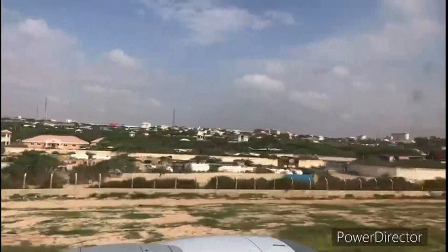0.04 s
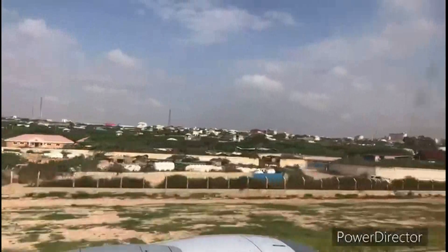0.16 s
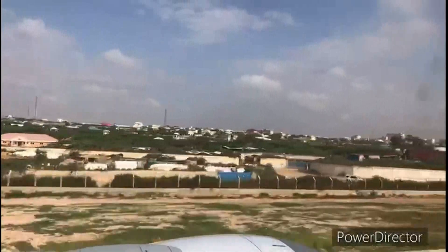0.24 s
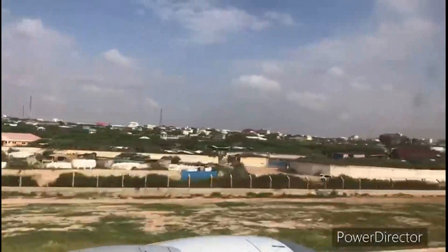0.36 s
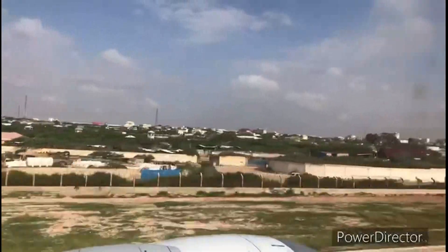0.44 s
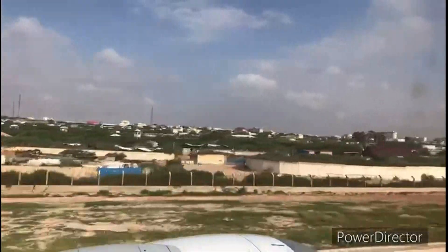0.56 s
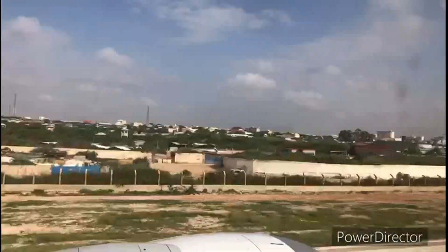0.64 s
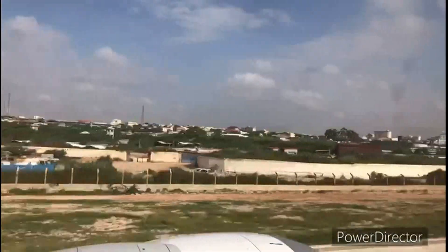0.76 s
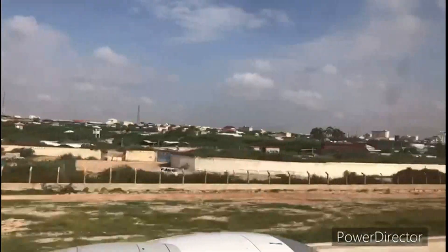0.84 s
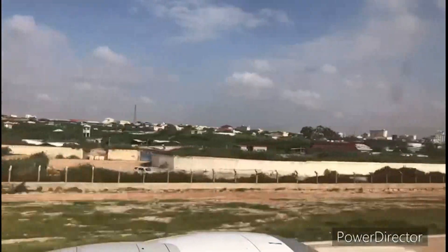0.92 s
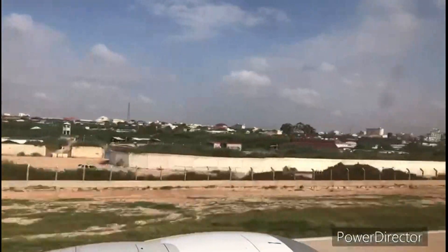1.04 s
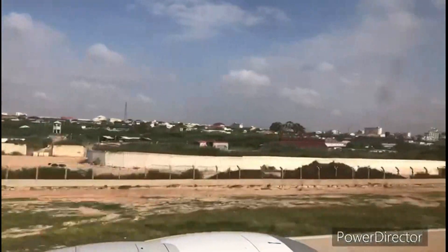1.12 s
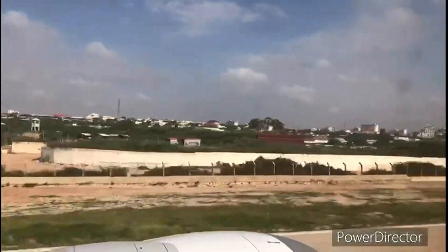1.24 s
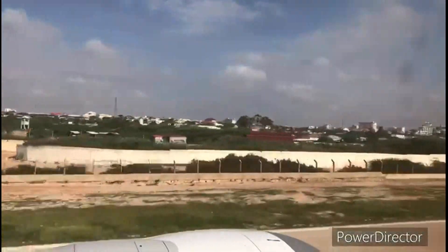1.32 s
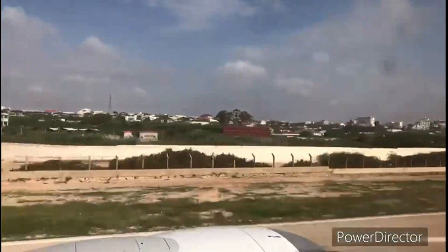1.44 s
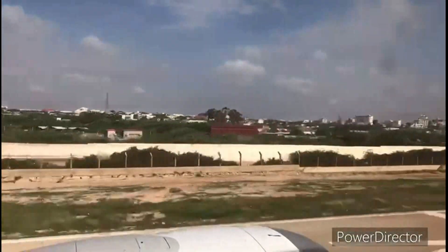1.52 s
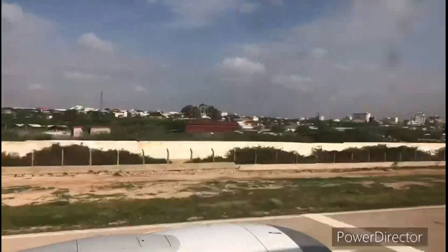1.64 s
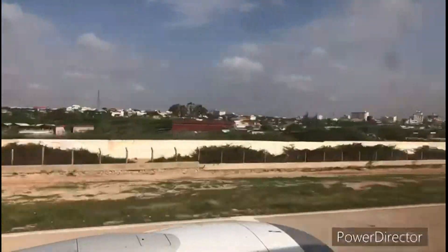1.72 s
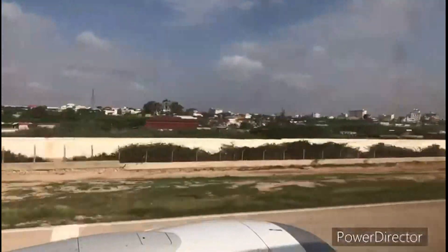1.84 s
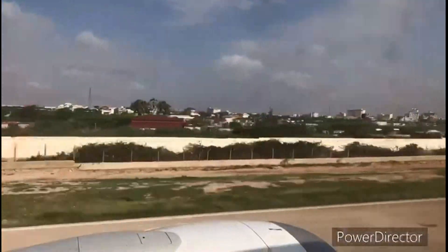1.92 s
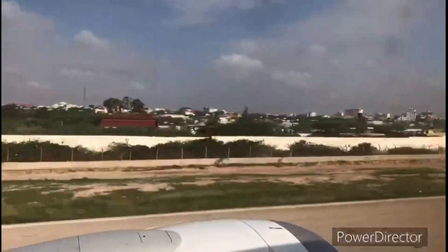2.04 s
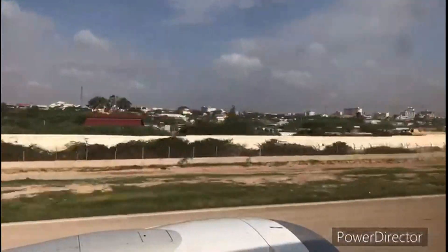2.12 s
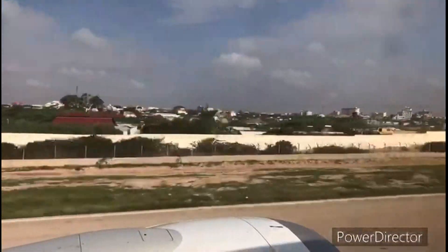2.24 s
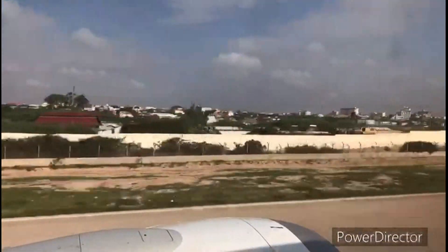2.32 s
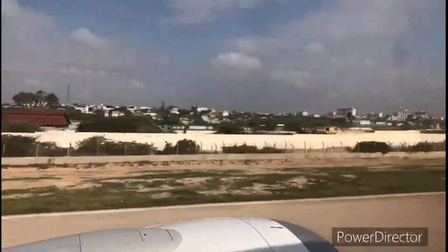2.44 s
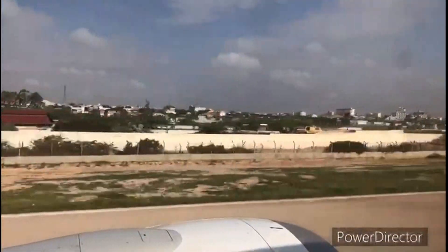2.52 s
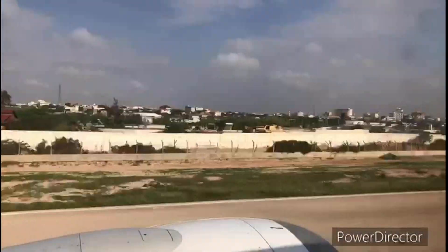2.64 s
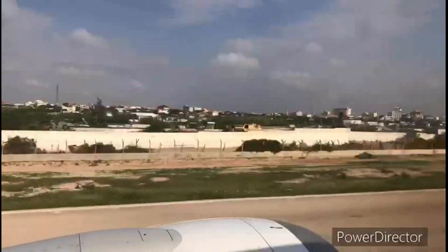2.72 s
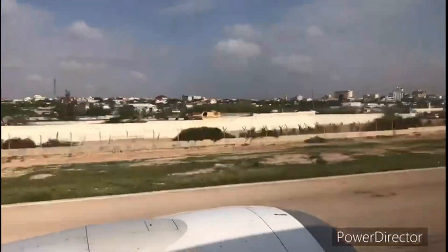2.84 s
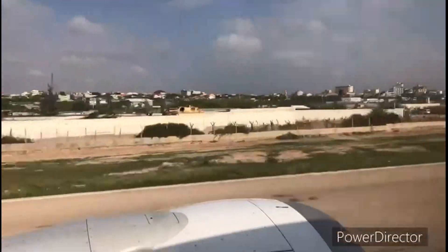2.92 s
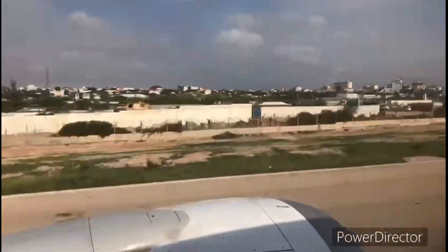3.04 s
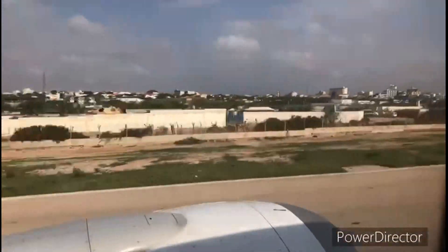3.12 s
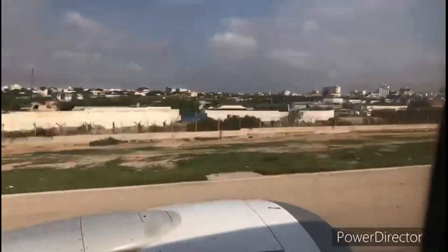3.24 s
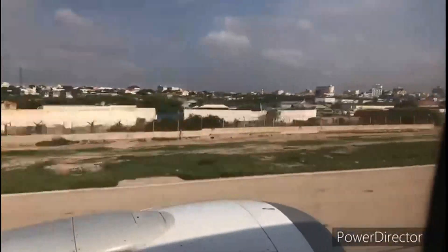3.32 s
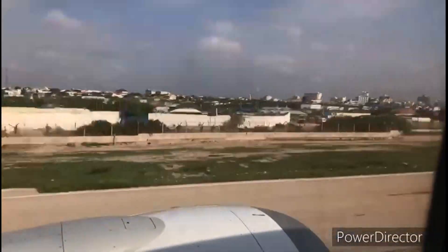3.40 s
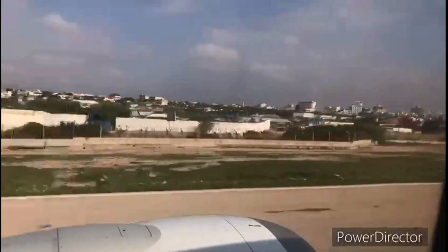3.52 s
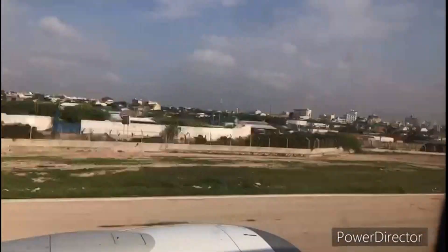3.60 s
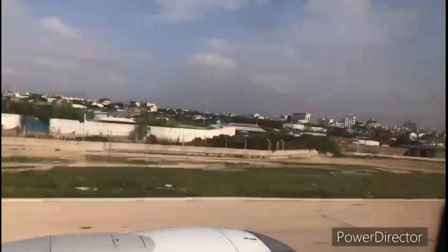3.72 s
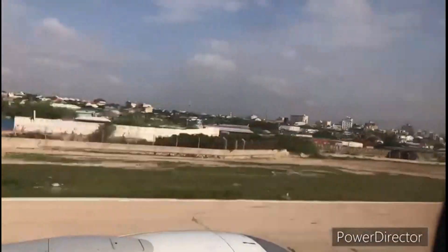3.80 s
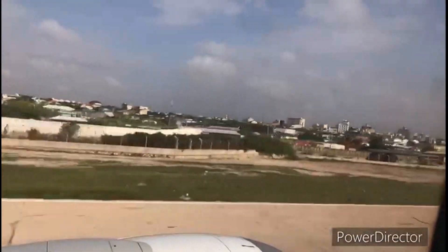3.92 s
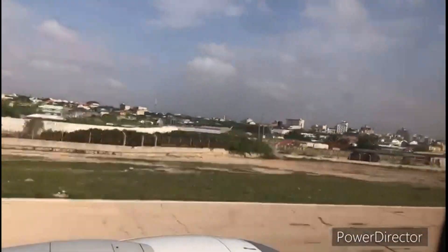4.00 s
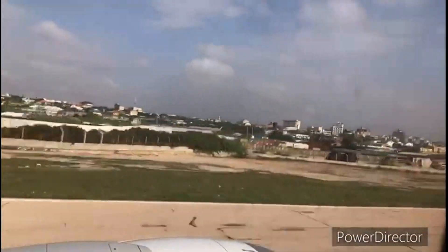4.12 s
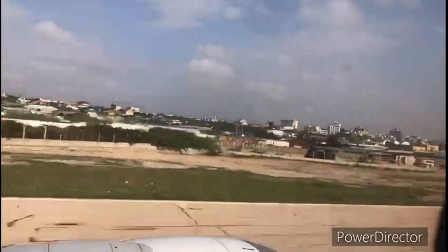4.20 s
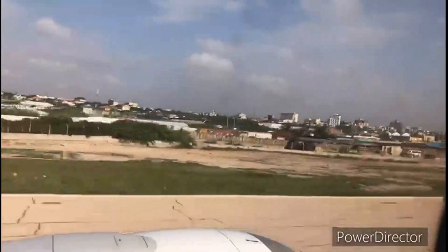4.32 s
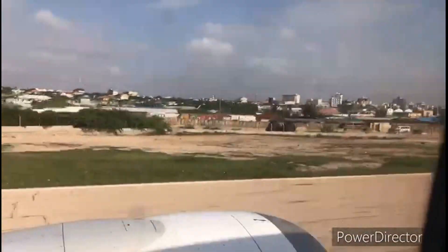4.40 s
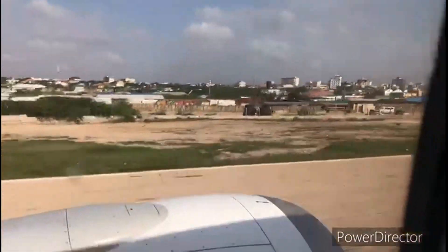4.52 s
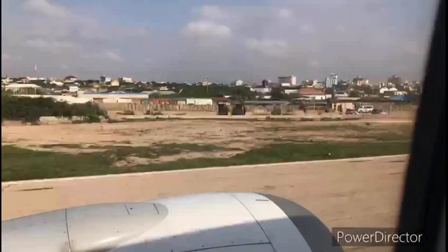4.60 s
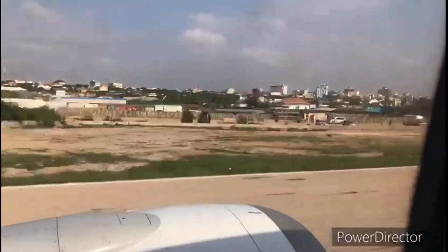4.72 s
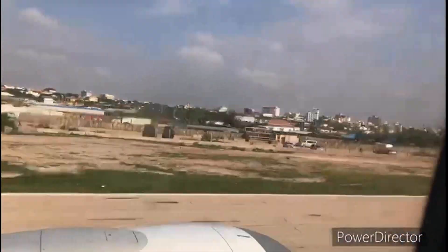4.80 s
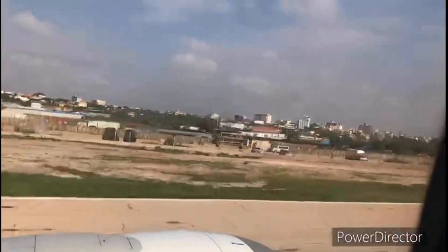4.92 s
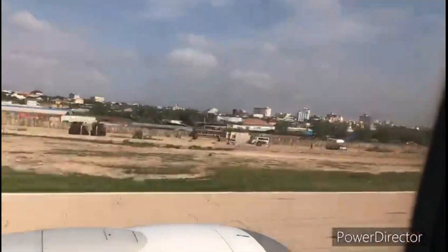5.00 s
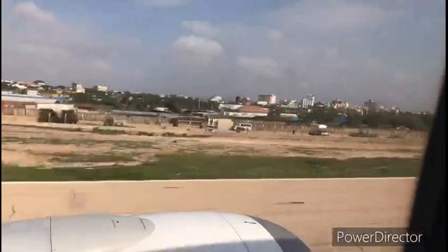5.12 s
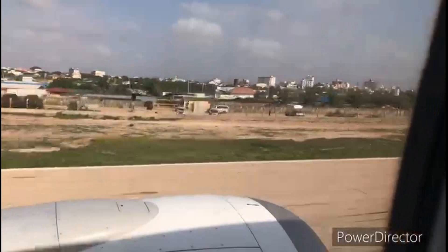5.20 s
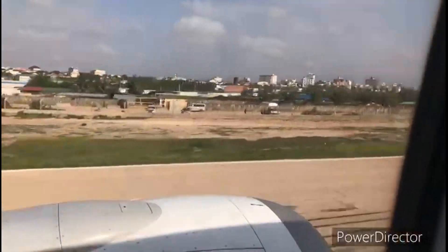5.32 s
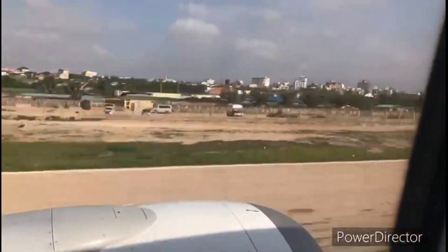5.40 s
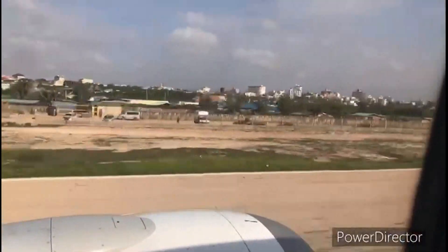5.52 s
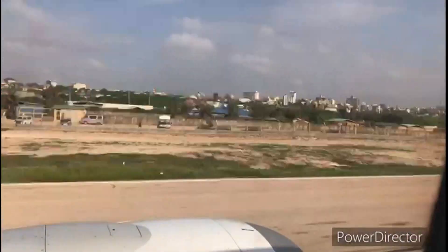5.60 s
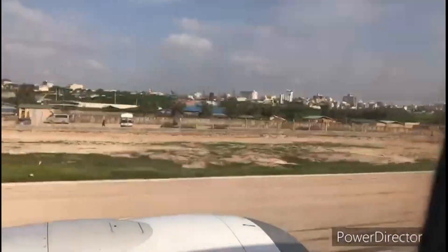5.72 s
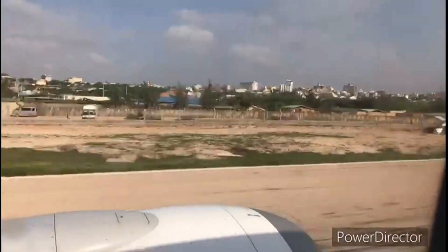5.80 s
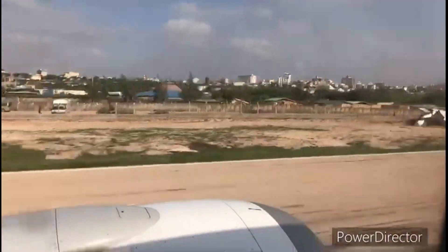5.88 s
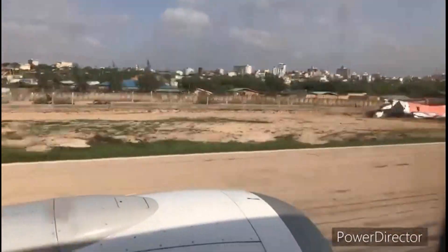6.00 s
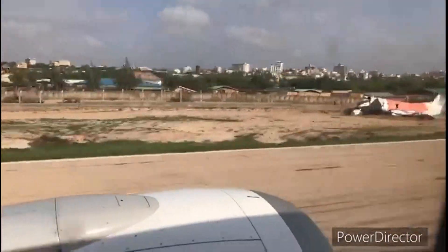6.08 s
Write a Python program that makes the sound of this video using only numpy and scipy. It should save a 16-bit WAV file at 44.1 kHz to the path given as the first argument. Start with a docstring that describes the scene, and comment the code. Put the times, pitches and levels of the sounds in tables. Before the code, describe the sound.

Inside an airliner cabin, air rushes steadily until the wheels touch down, bringing runway rumble, rattling trim and a building engine roar.

```python
"""An airliner lands; one microphone in the cabin, at a window seat beside the engine.
First air rushes along the fuselage over the idling fans, with one brief buffet near 1 s.
Just before 3 s the wheels touch: the cabin groans and the runway rumbles up through the airframe.
From then on the jolts shake the plastic trim into chatter, clacks and ticks, with one hollow knock.
Over the last two seconds or so a low engine roar builds as the plane brakes."""
import sys
import numpy as np
from scipy import signal
from scipy.fft import rfft, irfft
from scipy.io import wavfile
from scipy.ndimage import uniform_filter1d, map_coordinates

SR = 44100
rng = np.random.default_rng(int(sys.argv[2]) if len(sys.argv) > 2 else 0)


def dump_mix(stems):
    """Bounce the given channels to the path in sys.argv[1] as a 16-bit WAV at rate SR."""
    frames = np.atleast_2d(stems).T  # one column per channel
    limited = np.clip(frames, -1, 1)  # hard clip at full scale
    pcm = np.round(limited * 32767).astype(np.int16)
    wavfile.write(sys.argv[1], SR, pcm)


N = 271215
T = np.arange(N) / SR
HZ = np.fft.rfftfreq(N, 1 / SR)

# Levels in the tables are relative; a source may add its own gain.
# air along the fuselage, heard from inside: frequency_hz, level_db
AIR_SPECTRUM = [(20, -45), (35, -24), (48, -6.5), (100, -4), (155, -2), (200, -8), (350, -13), (500, -20),
                (740, -31), (920, -33), (1150, -42.5), (2900, -51), (3150, -57), (3900, -65),
                (10500, -74.5)]
# strength of that rush: time_s, level_db
AIR_LEVEL = [(0, -27.6), (0.8, -28.4), (2.6, -28.6), (3.4, -30.5), (6.15, -28.5)]
# narrow bands of the idling engine: pitch_hz, width_hz, level_db
FAN_BANDS = [(237.7, 19, -41.5), (332.7, 24, -42.5), (458.3, 7.3, -54.5), (885, 97, -60.5), (1494, 15, -71),
             (1875, 70, -72), (1997, 32, -73), (2700, 12, -83.5), (2966, 22, -77)]
# engine roar under braking: frequency_hz, level_db
ROAR_SPECTRUM = [(60, -14.5), (160, -4), (230, 1), (310, -1), (390, -3), (460, -14), (620, -18.5),
                 (900, -35), (1400, -38.5), (2700, -43), (4000, -63), (10000, -76.5)]
# strength of that roar: time_s, level_db
ROAR_LEVEL = [(3.6, -49), (4.2, -34.5), (4.8, -41), (5.1, -31), (5.5, -27.8), (5.9, -28.3), (6.15, -31)]
# slips of the trim: start_s, level_db, pitch_hz
SQUEAKS = [(1.652, -67, 3950), (2.491, -49.5, 1920), (3.154, -40, 2990)]
# ticks of small hard fittings: start_s, level_db, centre_hz
TICKS = [(2.882, -61, 7500), (4.001, -66, 7000), (4.283, -59, 6000), (4.3285, -51.5, 4820),
         (4.588, -66.5, 8900), (5.175, -57, 8500), (5.423, -64, 7000), (5.444, -64, 7500),
         (6.075, -56.5, 5500), (6.105, -57.5, 5900)]
# blows of a loose plastic panel: start_s, level_db
CLACKS = [(1.942, -62), (2.099, -61), (2.809, -57), (2.955, -57), (3.041, -53), (3.066, -51),
          (3.222, -45.5), (3.257, -56), (3.332, -55), (3.348, -42.5), (3.569, -45.5), (4.031, -51),
          (4.243, -49), (4.283, -50.5), (4.342, -47), (4.366, -53.5), (4.455, -51), (4.566, -50.5),
          (4.589, -55.5), (5.175, -54), (5.186, -51), (5.196, -50), (5.217, -52), (5.232, -51.5),
          (5.320, -54.5), (5.357, -54.5), (5.466, -58), (6.073, -55)]
# that panel's modes: pitch_hz, level_db, t60_s
PANEL_MODES = [(1340, -13, .02), (1800, -3, .022), (2150, -2.5, 0.016), (2340, 1, 0.018), (2540, -3, 0.019),
               (2780, -8, .013), (3110, -6, 0.016), (3560, -9.5, 0.012), (3950, -14, .013),
               (4750, -18, .012)]
# shaken cabin panels: frequency_hz, level_db
PANEL_SPECTRUM = [(300, -9.5), (500, 2.5), (800, 0.5), (1200, 0.5), (1600, 1), (1850, 1), (2100, 2.5),
                  (2450, 0), (3000, -3.5), (3500, -11), (4600, -21.5), (9000, -45.5)]
# light loose fittings: frequency_hz, level_db
FITTINGS_SPECTRUM = [(1500, -28), (3300, 3.5), (4800, 2.5), (6600, 3.5), (8000, -1), (9500, -3),
                     (10500, -15), (11800, -14.5)]
# fits of rattling in the trim: start_s, hold_s, build_s, panels_db, fittings_db
RATTLES = [(2.788, 0.45, 0.035, -55, -72), (2.959, 0.056, .02, -50.5, -74), (3.347, .02, 0.024, -52.5, -68),
           (3.491, 0.066, 0.046, -58, -70), (4.01, .04, .015, -65.5, -77), (4.253, 0.08, 0.036, -52.5, -68),
           (4.386, 0.11, .015, -55, -69), (4.583, .03, 0.011, -61, -74.5), (4.684, 0.099, .02, -59, -70.5),
           (4.951, .02, .02, -58.5, -74), (5.173, 0.079, .005, -51, -67.5), (5.425, .14, .03, -54, -70),
           (6.064, 0.047, .01, -69, -77)]
# cabin groans as the tyres spin up: centre_s, length_s, pitch_hz, width_hz, level_db
GROANS = [(2.92, 0.18, 177, 80, -25), (2.981, 0.065, 507.5, 18, -35.3)]
# modes of the hollow knock: pitch_hz, level_db, rise_s
KNOCK_MODES = [(585, 1, .0028), (865, -17, 0.0026), (1500, -10.5, 0.0016), (1750, -24, .0018),
               (2850, -9.5, 0.00084), (3250, -22, .0012), (4070, -29, .0011)]
# wheels on the runway, heard through the airframe: frequency_hz, level_db
RUMBLE_SPECTRUM = [(20, -56), (30, -26.5), (38, -12.5), (50, -4), (70, 0), (95, -4.5), (135, -4),
                   (180, -12.5), (250, -23.5), (400, -31), (800, -44), (1600, -89)]
# strength of the rumble once the wheels carry the weight: time_s, level_db
RUMBLE_LEVEL = [(2.62, -50), (2.74, -26.5), (3.3, -24.5), (3.7, -27), (4.4, -22.5), (5.5, -21.5),
                (5.88, -20.5), (6.15, -19.5)]
# jolts of the landing gear: start_s, level_db, pitch_hz, rise_s
JOLTS = [(2.842, -18.5, 110, .012), (2.908, -16.5, 84.6, 0.011), (2.926, -14.5, 62, .022),
         (3.003, -13, 66, .018), (3.043, -12.5, 117.5, .014), (3.560, -15, 57, .016),
         (4.270, -12.5, 51, .02), (4.355, -19, 117.3, .018), (4.497, -14.5, 67.3, .014),
         (4.558, -15.5, 74.6, .011), (4.836, -18, 73, .007), (5.204, -11.5, 75.5, .018),
         (5.256, -11.5, 60, .024), (5.647, -16.5, 72, .014), (5.808, -11.5, 97.8, .011),
         (5.897, -14, 85.5, .008), (5.978, -16, 68, .014), (6.044, -16.5, 140.4, 0.012)]


def amp(db):
    """Decibels to gain."""
    return 10 ** (np.asarray(db) / 20)


def unit(x):
    """Scales to rms 1."""
    return x / np.sqrt(np.mean(x ** 2) + 1e-20)


def fader(curve):
    """Gain along (time_s, level_db) points, silent before the first."""
    times, db = np.transpose(curve)
    return amp(np.interp(T, times, db, left=-np.inf))


def colour(x, spectrum):
    """Filters x through (frequency_hz, level_db) points; comes out at rms 1."""
    hz, db = np.transpose(spectrum)
    response = amp(np.interp(np.log(HZ + 1), np.log(hz), db))
    return unit(irfft(rfft(x) * response, N))


def steadied(x, span_s):
    """Evens out swells slower than span_s."""
    size = max(int(span_s * SR), 2)
    power = uniform_filter1d(uniform_filter1d(x ** 2, size), size)
    return x / np.sqrt(power + 1e-9)


def steady_noise(spectrum, span_s):
    """Coloured noise held at an even level."""
    return steadied(colour(rng.standard_normal(N), spectrum), span_s)


def fuzzy_tone(hz, width_hz, sag_per_s=0):
    """Noise in one resonance, its pitch sinking by the share sag_per_s each second."""
    tone = irfft(rfft(rng.standard_normal(N)) / (1 + ((HZ - hz) / width_hz * 2) ** 2), N)
    slowed_time = T - sag_per_s * T ** 2 / 2
    return unit(map_coordinates(tone, [slowed_time * SR], order=3, mode="wrap"))


def swell(centre_s, length_s, hz, width_hz, db):
    """A fuzzy tone that rises and fades around centre_s."""
    envelope = np.exp(-(2 * (T - centre_s) / length_s) ** 2)
    return amp(db) * steadied(fuzzy_tone(hz, width_hz), span_s=0.073) * envelope


def burst(hz, rise_s, order=1):
    """A sine that peaks after rise_s and dies away; a higher order starts more softly."""
    t = T[:SR // 3]
    envelope = (t / rise_s * np.exp(1 - t / rise_s)) ** order
    return envelope * np.sin(2 * np.pi * hz * t)


def ring(modes, cycles):
    """Dying sines of a struck object; each builds over its first cycles, so the treble speaks first."""
    out, t = 0, T[:SR // 5]
    for hz, db, t60 in modes:
        onset = np.sin(np.pi / 2 * np.minimum(hz * t / cycles, 1)) ** 2
        out += onset * amp(db - 60 * t / t60) * np.sin(2 * np.pi * hz * t)
    return out


def contacts(per_s, spread_db, t60_s, parts):
    """Loose parts collide with blows of uneven size; each part has its own short ring."""
    strength = amp(spread_db * np.minimum(rng.exponential(1, N), 4))
    clicks = strength * rng.choice([-1, 1], N) * (rng.random(N) < per_s / SR)
    struck_part = rng.integers(0, parts, N)
    t = T[:SR // 10]
    rings = rng.standard_normal((parts, len(t))) * amp(-60 * t / t60_s)
    tails = sum(signal.oaconvolve(clicks * (struck_part == k), rings[k])[:N] for k in range(parts))
    return 0.5 * unit(clicks) + unit(tails)


def add(mix, start_s, sound):
    """Mixes a sound in at start_s."""
    part = mix[round(start_s * SR):][:len(sound)]
    part += sound[:len(part)]


def air_rush():
    """Air streams along the fuselage outside the window and buffets once on the approach."""
    rush = steady_noise(AIR_SPECTRUM, span_s=0.54) * fader(AIR_LEVEL)
    buffet = swell(centre_s=0.89, length_s=0.075, hz=180, width_hz=130, db=-26)
    return rush + buffet


def idling_fans(gain_db=-1, sag_per_s=0.001):
    """The engine beside the seat hums in narrow bands and slowly winds down."""
    return amp(gain_db) * sum(amp(db) * fuzzy_tone(hz, width, sag_per_s) for hz, width, db in FAN_BANDS)


def braking_roar():
    """A low roar swells as the engines work against the roll."""
    return steady_noise(ROAR_SPECTRUM, span_s=0.18) * fader(ROAR_LEVEL)


def trim_squeaks():
    """Plastic slips on plastic for a few milliseconds."""
    out = np.zeros(N)
    for start, db, hz in SQUEAKS:
        add(out, start, amp(db) * burst(hz, rise_s=0.0018))
    return out


def fitting_ticks(decay_s=0.0053, half_width_octaves=0.43):
    """Small hard parts tick, each a thin, bright flick of noise."""
    out, t = np.zeros(N), T[:SR // 20]
    bins_hz = np.fft.rfftfreq(len(t), 1 / SR) + 1
    for start, db, hz in TICKS:
        rolloff = 1 + (np.log2(bins_hz / hz) / half_width_octaves) ** 2
        fizz = irfft(rfft(rng.standard_normal(len(t))) / rolloff, len(t))
        add(out, start, amp(db) * unit(fizz) * np.exp(-t / decay_s))
    return out


def panel_clacks(gain_db=1, skitter_gain=0.11, skitter_s=0.009, vary_db=2, detune=0.02):
    """A panel strikes its frame once, then skitters; each blow favours other modes."""
    out, t = np.zeros(N), T[:SR // 25]
    for start, db in CLACKS:
        blow = skitter_gain * rng.standard_normal(len(t)) * np.exp(-t / skitter_s)
        blow[0] += 1  # the strike itself
        modes = [(hz * (1 + detune * rng.standard_normal()),
                  mode_db + vary_db * rng.standard_normal(), t60) for hz, mode_db, t60 in PANEL_MODES]
        clack = signal.fftconvolve(blow, ring(modes, cycles=1.2))
        attack_rms = np.std(clack[:SR // 125])
        add(out, start, amp(db + gain_db) * clack / attack_rms)
    return out


def trim_chatter(rumble, fittings_gain_db=2, rock_db=-0.5, settle_s=0.071):
    """Trim around the seat buzzes and rattles in fits, its blows swaying slightly with the airframe."""
    sway = amp(rock_db * np.tanh(steadied(rumble, span_s=0.1)))
    # between fits, a faint buzz follows the strength of the rumble
    panels_power = (amp(-37) * fader(RUMBLE_LEVEL)) ** 2
    fittings_power = (amp(-57) * fader(RUMBLE_LEVEL)) ** 2
    for start, hold, build, panels_db, fittings_db in RATTLES:
        envelope = np.exp(np.minimum(T - start, 0) / build - np.maximum(T - start - hold, 0) / settle_s)
        panels_power += (amp(panels_db) * envelope) ** 2
        fittings_power += (amp(fittings_db) * envelope) ** 2
    panel_hits = contacts(per_s=750, spread_db=2.5, t60_s=0.035, parts=6)
    fitting_hits = contacts(per_s=1200, spread_db=4, t60_s=0.04, parts=8)
    panels = colour(panel_hits * sway, PANEL_SPECTRUM) * np.sqrt(panels_power)
    fittings = colour(fitting_hits * sway, FITTINGS_SPECTRUM) * np.sqrt(fittings_power)
    return panels + amp(fittings_gain_db) * fittings


def cabin_strain(knock_s=3.5074, knock_gain_db=-24.2):
    """The cabin takes the load: two short groans, then a hollow knock."""
    out = sum(swell(*groan) for groan in GROANS)
    knock = sum(amp(db) * burst(hz, rise, order=2) for hz, db, rise in KNOCK_MODES)
    add(out, knock_s, amp(knock_gain_db) * knock)
    return out


def runway_rumble(jolt_gain_db=-1, surge_gain_db=-10, surge_width_rises=3.3):
    """Tyres roll on rough concrete below; each jolt presses them down and swings the airframe."""
    power = fader(RUMBLE_LEVEL) ** 2
    swings = np.zeros(N)
    for start, db, hz, rise in JOLTS:
        surge = np.exp(-((T - start - rise) / (surge_width_rises * rise)) ** 2)
        power += (amp(db + surge_gain_db) * surge) ** 2
        add(swings, start, amp(db + jolt_gain_db) * burst(hz, rise))
    return steady_noise(RUMBLE_SPECTRUM, span_s=0.086) * np.sqrt(power) + swings


def scene():
    """Everything as it reaches the window seat, in mono."""
    rumble = runway_rumble()
    cabin = trim_chatter(rumble) + panel_clacks() + trim_squeaks() + fitting_ticks() + cabin_strain()
    background = air_rush() + idling_fans() + braking_roar()
    return (background + cabin + rumble)[None]


def record(dry):
    """The microphone and recorder pass nothing much above 12 kHz."""
    lowpass = signal.firwin(511, 12000, window=("kaiser", 9), fs=SR)
    return signal.oaconvolve(dry, lowpass[None], "same")


dry = scene()
out = record(dry)
dump_mix(out)
```